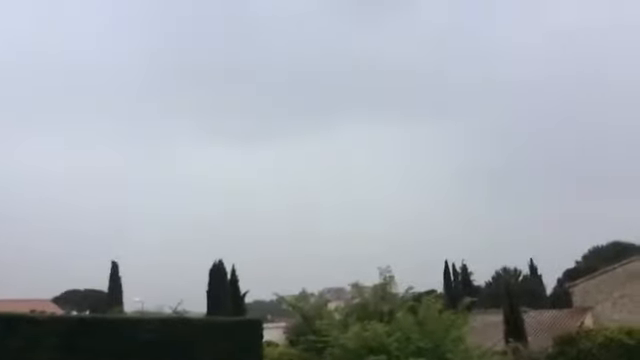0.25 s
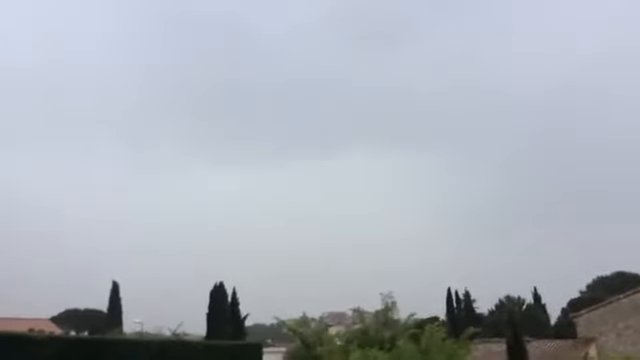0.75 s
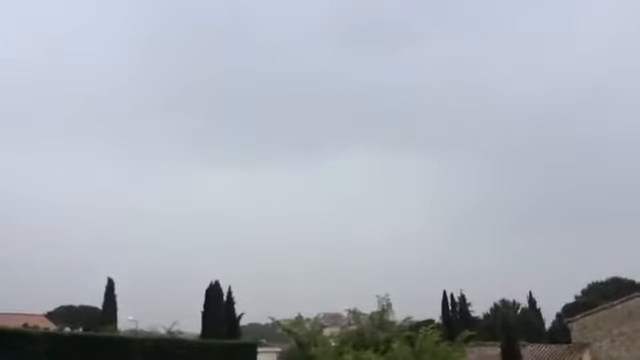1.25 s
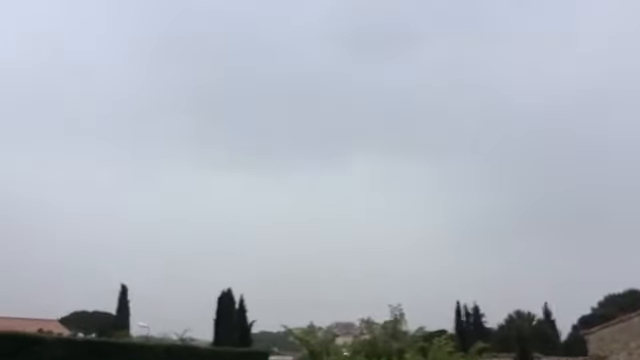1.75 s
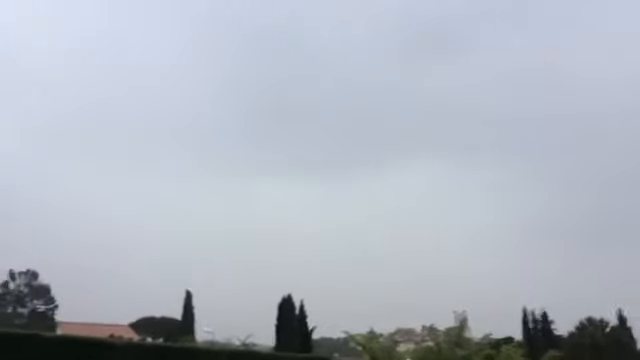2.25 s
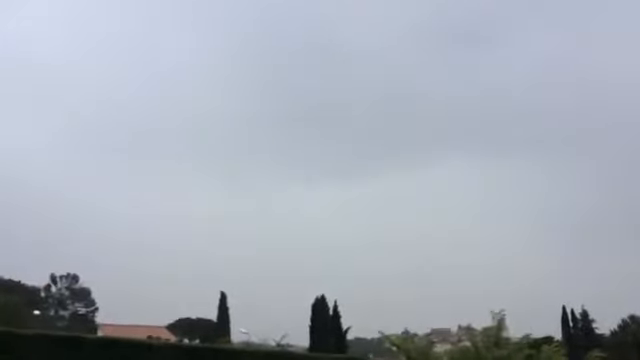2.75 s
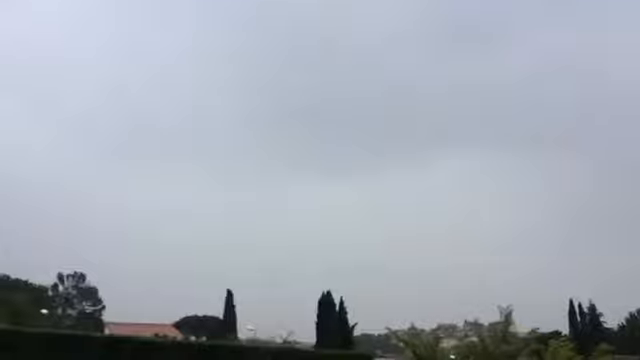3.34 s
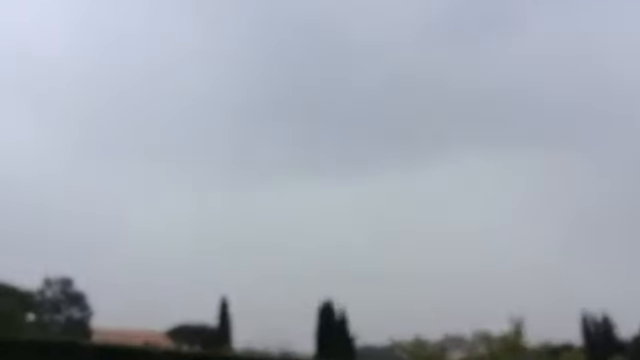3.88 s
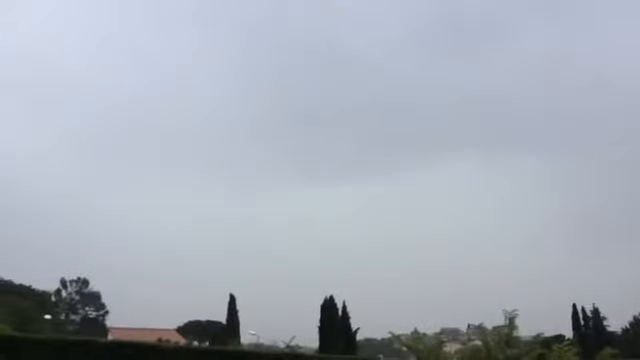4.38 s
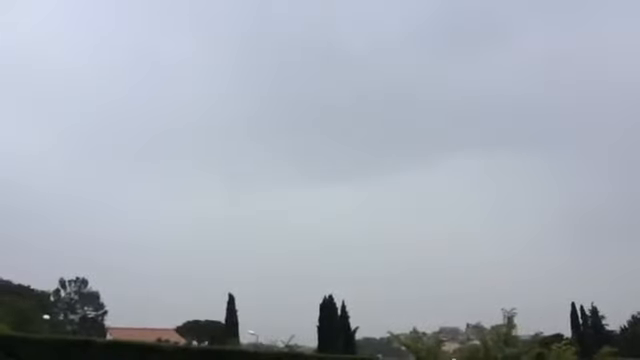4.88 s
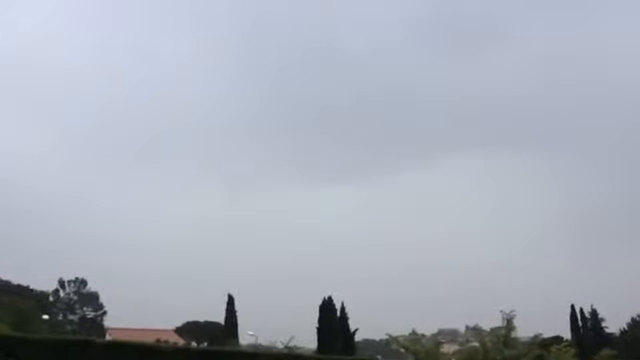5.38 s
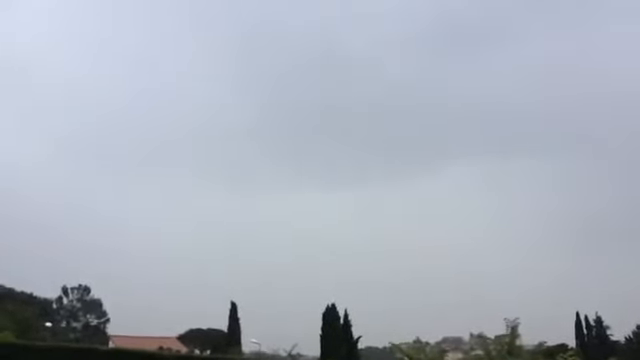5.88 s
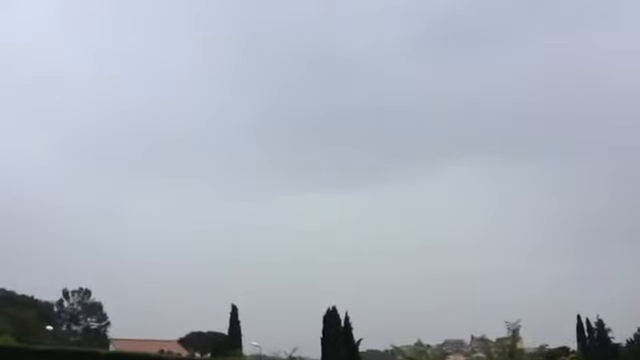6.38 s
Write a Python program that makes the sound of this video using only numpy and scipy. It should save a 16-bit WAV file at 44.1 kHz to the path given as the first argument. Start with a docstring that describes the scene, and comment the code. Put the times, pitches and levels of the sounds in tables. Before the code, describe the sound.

Distant thunder and steady rain sound together from the start, outdoors in a garden. The thunder is a deep rumble with a brighter growl, moving in uneven surges. It opens with a few dull thuds, reaches its strongest cluster around 0.8 seconds, and thuds again near 1.5 seconds. Softer bumps follow at about 2.1, 3.1, 3.6 and 4 seconds. The growl then sinks to a low murmur before the roll swells once more around 6 seconds. Throughout, far rain makes an even hiss that eases only slightly, with fine patter on leaves and tiles. Close drops tick sharply or land as fat splats on wet ground at irregular moments, the sharpest near 0.7 seconds, with a quick group around 1.6 seconds and fewer later on. Everything is heard from one microphone position, with slightly softened treble.

```python
"""Distant thunder thuds and rolls away over a garden in steady rain.
The roll is a crowd of low pressure waves from a long lightning channel: a deep rumble and a brighter
growl that come in surges, with a few stronger thuds. Close drops tick or land as fat splats, others
patter on leaves, and countless far ones merge into a wash. One microphone hears it all."""
import sys
import numpy as np
from scipy import signal
from scipy.fft import rfft, irfft
from scipy.io import wavfile
from scipy.ndimage import uniform_filter1d

SR = 44100
rng = np.random.default_rng(int(sys.argv[2]) if len(sys.argv) > 2 else 0)


def master(y):
    """Save y as 16-bit WAV."""
    cut = np.clip(np.atleast_2d(y).T, -1, 1)
    pcm = np.round(cut * 32767)  # scale
    wavfile.write(sys.argv[1], SR, pcm.astype(np.int16))


N = 291942

# Tone curves of the thunder's two layers. Each row: frequency in Hz, relative level in dB.
RUMBLE_COLOUR = [(15, -30), (30, -15.5), (45, -5.5), (62, 2), (80, -1), (100, 0.5), (130, -8.5),
                 (220, -43.5)]
GROWL_COLOUR = [(70, -24.5), (105, -12.5), (135, 0.5), (160, -0.5), (225, -3.5), (262, -9.5), (300, -9.5),
                (355, -15), (440, -14.5), (600, -23), (1000, -36), (2500, -68.5)]
# Surges in the roll, each from one branch of the lightning channel.
# Each row: crest time in seconds, length in seconds, rumble and growl levels in dB before their trims.
BRANCH_SURGES = [(0.054, .08, -45.5, -41), (0.157, 0.059, -47, -45), (.31, .24, -47.5, -45.5),
                 (0.673, 0.14, -44, -39), (0.821, 0.12, -51, -35), (0.927, .12, -48.5, -54),
                 (1.287, 0.29, -58, -39), (1.473, 0.11, -44, -43), (1.76, .15, -48.5, -50),
                 (2.07, 0.22, -47, -47.5), (2.379, 0.063, -43, -51), (2.635, 0.097, -46.5, -45),
                 (2.72, 0.041, -47.5, -44.5), (2.875, 0.17, -65, -46), (3.06, 0.26, -46, -42.5),
                 (3.61, 0.19, -46.5, -51), (3.8, 0.061, -52, -46.5), (4.035, 0.058, -44, -52),
                 (4.336, 0.065, -48, -67), (4.567, 0.097, -51.5, -49), (4.96, 0.14, -47, -64),
                 (5.23, 0.28, -56.5, -55.5), (5.85, 0.37, -49, -51.5), (6.086, 0.099, -44.5, -47),
                 (6.18, 0.14, -44.5, -44.5), (6.445, 0.11, -47.5, -51.5)]
# Thuds in the roll. Each row: centre time in seconds, level in dB, pitch in Hz.
THUNDER_THUDS = [(.017, -27, 134), (.103, -29, 167), (.164, -29.5, 90), (.704, -31, 90), (.779, -25, 170),
                 (.813, -29, 141), (.842, -22, 152), (1.459, -28, 160), (1.503, -28, 131),
                 (2.118, -33, 101), (3.048, -30.5, 133), (3.103, -31.5, 111), (3.596, -32, 125),
                 (4.039, -35.5, 99), (6.198, -31.5, 100)]
# Drops close by. Each row: start in seconds, tick peak in dB, pitch in Hz, spray in dB against the tick.
CLOSE_DROPS = [(.055, -32, 3400, -9), (0.072, -32.5, 2360, -1.5), (0.1114, -30, 3300, -16),
               (0.251, -32, 1700, -12), (.6564, -29, 6200, -16), (0.685, -18.5, 6700, -15),
               (0.978, -29, 3970, -16), (1.1379, -27, 2280, -18), (1.5872, -34.5, 3640, -1.5),
               (1.6072, -31, 2890, -3.5), (1.6385, -28, 2830, -2), (1.864, -28, 2580, -18),
               (2.047, -35, 6650, -6.5), (2.353, -35, 3000, -20), (3.2385, -29, 4630, -10),
               (3.259, -33, 2020, -10), (3.59, -32.5, 5130, -5), (4.9735, -32, 1300, -10),
               (5.1234, -34, 2650, -13), (5.1282, -30, 2730, -13), (6.2985, -30, 2300, -12)]
# Fat drops on wet ground. Each row: start in seconds, level in dB, pitch in Hz, width as a pitch factor.
GROUND_SPLATS = [(.252, -40.5, 1500, 1.55), (.305, -43.5, 1690, 2.5), (0.655, -44, 6300, 1.07),
                 (0.684, -39.5, 5860, 1.16), (.766, -41.5, 1650, 1.44), (1.136, -46, 5000, 1.17),
                 (1.334, -45.5, 1450, 2), (1.637, -42, 2800, 2), (1.797, -45.5, 1400, 1.9),
                 (1.881, -40.5, 1600, 1.7), (2.113, -46, 1500, 1.44), (2.354, -44.5, 1400, 1.6),
                 (2.617, -41, 1380, 1.8), (2.859, -45.5, 1190, 1.9), (3.289, -48.5, 2870, 1.12),
                 (3.595, -42.5, 850, 2.6), (3.968, -46, 1630, 1.5), (4.413, -44, 1580, 2.1),
                 (4.928, -45.5, 1600, 2.4), (5.129, -46, 2700, 1.4), (5.155, -45, 3400, 1.6),
                 (6.03, -47, 2800, 1.14), (6.061, -43.5, 2630, 1.19)]
# Tone curve of the far rain. Each row: frequency in Hz, relative level in dB.
WASH_COLOUR = [(150, -10), (350, 3.5), (550, 0.5), (780, 0), (1000, 0.5), (1500, -0.5), (2300, -2),
               (3200, -4.5), (5000, -5.5), (6800, -5.5), (8000, -11.5)]


def thunder():
    """Far parts of the channel rumble, nearer parts growl; stretches that arrive together thud."""
    rumble_trim_db, growl_trim_db, thud_half_width_cycles = 0.45, -0.5, 0.68
    rumble, growl = surges()
    roll = gain_of(rumble_trim_db) * rumble * rolling(RUMBLE_COLOUR, per_s=700, blend_s=0.059)
    roll += gain_of(growl_trim_db) * growl * rolling(GROWL_COLOUR, per_s=900, blend_s=0.06)
    thuds, in_step = np.zeros(N), np.zeros(N)
    window = np.arange(-SR // 20, SR // 20) / SR
    for centre_s, db, hz in THUNDER_THUDS:
        t = window[window >= -centre_s]
        swell = np.exp(-(t * hz / thud_half_width_cycles) ** 2)
        add(thuds, centre_s + t[0], -gain_of(db) * swell * np.sin(2 * np.pi * hz * t))
        add(in_step, centre_s + t[0], swell)
    # while the waves arrive in step, the roll ducks under one clean thud
    return roll * (1 - np.minimum(in_step, 1)) + thuds


def surges():
    """Envelopes of rumble and growl: each surge swells fast and ebbs, adding its power to a bed."""
    rise_share, sink_s = 0.36, 3.5
    t = np.arange(N) / SR
    rumble_power = np.full(N, gain_of(-55) ** 2)  # the deep bed holds
    growl_power = gain_of(-53 + 11.5 * np.exp(-t / sink_s)) ** 2  # the brighter bed sinks to a murmur
    for crest_s, length_s, rumble_db, growl_db in BRANCH_SURGES:
        slope_s = length_s * np.where(t < crest_s, rise_share, 1 - rise_share)
        swell = np.exp(-((t - crest_s) / slope_s) ** 2)
        rumble_power += gain_of(rumble_db) ** 2 * swell
        growl_power += gain_of(growl_db) ** 2 * swell
    return np.sqrt(rumble_power), np.sqrt(growl_power)


def rolling(colour, per_s, blend_s):
    """Shock waves dulled by miles of air, overlapping into a roll of even strength."""
    waves = coloured(impacts(per_s, spread_db=0.5), colour)
    local_power = uniform_filter1d(waves ** 2, int(blend_s * SR))
    return waves / np.sqrt(local_power + 1e-6)


def drops():
    """A close drop: one sharp tick, a quick burst of spray, then a faint trail of droplets."""
    burst_s, trail_s, trail_gain = 0.00061, 0.023, 0.16
    out, t = np.zeros(N), np.arange(SR // 8) / SR
    for start_s, db, hz, spray_db in CLOSE_DROPS:
        tick = band(signal.unit_impulse(len(t)), hz, spread=2)
        spray = evened(band(rng.standard_normal(len(t)), hz, spread=1.35))
        spray *= np.exp(-t / burst_s) + trail_gain * np.exp(-t / trail_s)
        add(out, start_s, gain_of(db) * (tick / abs(tick).max() + gain_of(spray_db) * spray))
    return out


def splats():
    """A fat drop slaps down and bursts into a grainy puff: dull on soil, narrow and bright in a puddle."""
    attack_s, slap_db = 0.0034, 7
    out, t = np.zeros(N), np.arange(SR // 5) / SR
    for start_s, db, hz, spread in GROUND_SPLATS:
        slap = band(signal.unit_impulse(len(t)), hz, spread)
        grains = rng.standard_normal(len(t)) * rng.exponential(1, len(t))
        spray = evened(band(grains, hz, spread))
        decay_s = 0.027 * (1500 / hz) ** 0.63  # finer, brighter spray dies sooner
        spray *= (1 - np.exp(-t / attack_s)) * np.exp(-t / decay_s)
        add(out, start_s, gain_of(db) * (spray + gain_of(slap_db) * slap / abs(slap).max()))
    return out


def patter():
    """Drops on leaves and tiles: each surface has its own pitch, and each hit trails a little spray."""
    level_db, flurry_db, spray_db, spray_decay_s = -54, 1.3, -1.5, 0.008
    out, t = np.zeros(N), np.arange(SR // 20) / SR
    flurries = gain_of(flurry_db * drift(rate_hz=9.2))
    for hz in np.geomspace(1000, 6600, num=18):
        spray = rng.standard_normal(len(t)) * np.exp(-t / spray_decay_s)
        hit = signal.unit_impulse(len(t)) + gain_of(spray_db) * spray / np.linalg.norm(spray)
        taps = impacts(per_s=55, spread_db=3.3) * flurries
        out += evened(signal.oaconvolve(taps, band(hit, hz, spread=1.38))[:N])
    return gain_of(level_db) * evened(out)


def wash():
    """Far rain: drops too many to tell apart, a hiss that shifts in faint patches and slowly eases."""
    start_db, ease_db_per_s, patch_db = -47.5, 0.17, 0.94
    _, _, spectra = signal.stft(rng.standard_normal(N), SR, nperseg=512, noverlap=384)
    patches = uniform_filter1d(rng.standard_normal(spectra.shape), size=14, axis=0)  # blur in pitch
    patches = evened(uniform_filter1d(patches, size=14, axis=1))  # and in time
    _, hiss = signal.istft(spectra * gain_of(patch_db * patches), SR, nperseg=512, noverlap=384)
    fade = gain_of(start_db - ease_db_per_s * np.arange(N) / SR)
    return fade * coloured(hiss[:N], WASH_COLOUR)


def impacts(per_s, spread_db):
    """Clicks at random moments: many small, a few large."""
    size = gain_of(spread_db * np.minimum(rng.exponential(1, N), 4))
    return size * rng.choice([-1, 1], N) * (rng.random(N) < per_s / SR)


def coloured(x, colour):
    """Shapes x with a tone curve drawn on a log-frequency axis; rms 1."""
    hz, db = np.transpose(colour)
    curve_db = np.interp(np.log(np.fft.rfftfreq(N, 1 / SR) + 1), np.log(hz), db)
    return evened(irfft(rfft(x) * gain_of(curve_db), N))


def band(x, hz, spread):
    """A resonance from hz / spread to hz * spread."""
    return signal.sosfilt(signal.butter(2, [hz / spread, hz * spread], "bandpass", fs=SR, output="sos"), x)


def drift(rate_hz):
    """A slow random wobble; rms 1."""
    rolloff = np.exp(-(np.fft.rfftfreq(N, 1 / SR) / rate_hz) ** 2)
    return evened(irfft(rfft(rng.standard_normal(N)) * rolloff, N))


def gain_of(db):
    """Decibels to amplitude."""
    return 10 ** (np.asarray(db) / 20)


def evened(x):
    """Scales to rms 1."""
    return x / np.sqrt(np.mean(x ** 2) + 1e-20)


def add(mix, start_s, sound):
    """Lays a sound into the mix at start_s."""
    part = mix[max(round(start_s * SR), 0):][:len(sound)]
    part += sound[:len(part)]


def scene():
    """Thunder and rain reach a single microphone, alike in both channels."""
    return np.tile(thunder() + wash() + patter() + drops() + splats(), (2, 1))


def record(dry):
    """The microphone sheds the deepest bass; the recorder rounds off the treble, then cuts it steeply."""
    low_cut_hz, round_off_hz, high_cut_hz = 19, 7860, 8030
    thinned = signal.sosfilt(signal.butter(2, low_cut_hz, "highpass", fs=SR, output="sos"), dry)
    rounded = signal.sosfilt(signal.butter(14, round_off_hz, fs=SR, output="sos"), thinned)
    brick_wall = signal.firwin(601, high_cut_hz, window=("kaiser", 8), fs=SR)
    return signal.oaconvolve(rounded, brick_wall[None], "same")


dry = scene()
out = record(dry)
master(out)
```